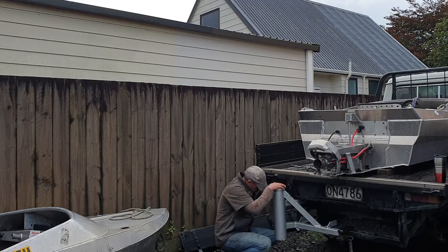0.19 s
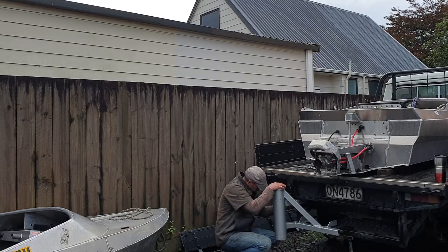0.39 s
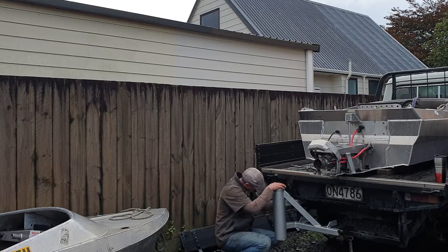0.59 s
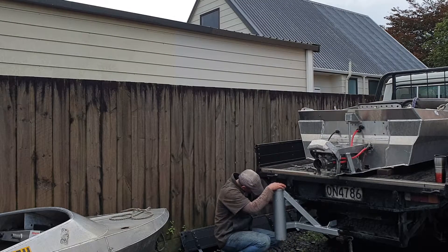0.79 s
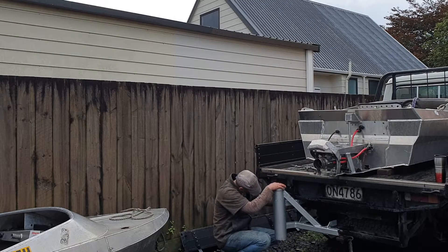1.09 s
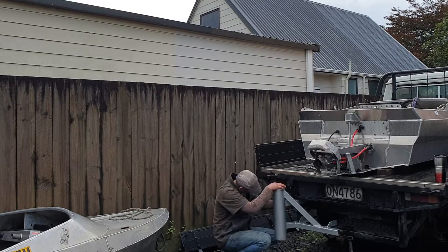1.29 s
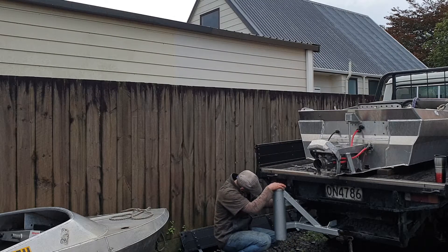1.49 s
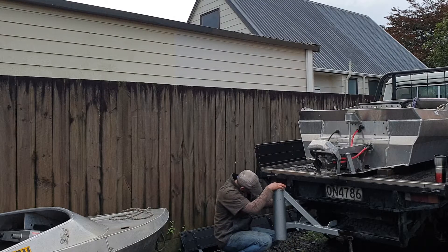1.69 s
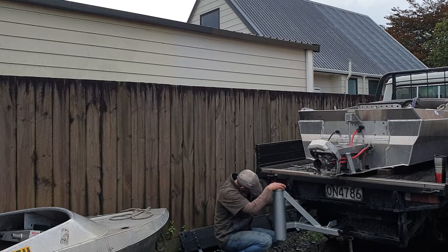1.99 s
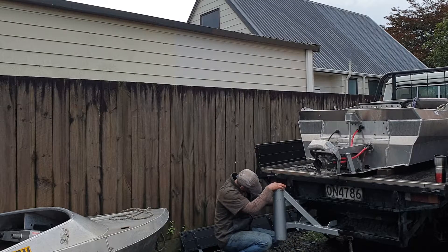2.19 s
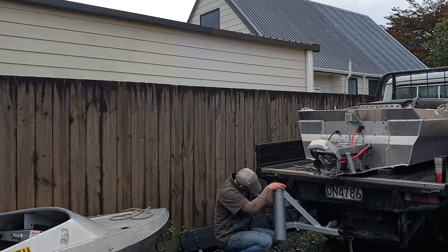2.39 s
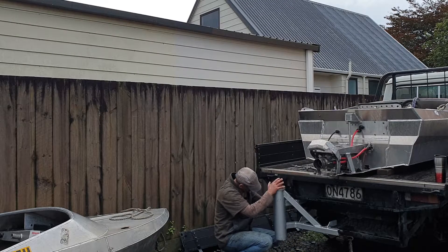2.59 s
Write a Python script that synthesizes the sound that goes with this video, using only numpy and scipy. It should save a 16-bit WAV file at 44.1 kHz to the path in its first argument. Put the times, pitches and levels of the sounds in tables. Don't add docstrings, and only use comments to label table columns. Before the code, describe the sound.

Shrill metal squeaks and hollow thuds as a steel post is rocked by hand outdoors

```python
import sys
import numpy as np
from scipy import signal
from scipy.fft import rfft, irfft
from scipy.io import wavfile

SR = 44100
rng = np.random.default_rng(int(sys.argv[2]) if len(sys.argv) > 2 else 0)


def put_to_file(sound):
    columns = np.atleast_2d(sound).T
    safe = np.clip(columns, -1, 1)
    whole_steps = np.round(safe * 32767)
    wavfile.write(sys.argv[1], SR, whole_steps.astype(np.int16))


def nominal_scale(level):
    x = np.asarray(level, float) / 20
    return 10 ** x


N = 119070

# pitch_hz, density_db (per Hz)
TOWN_SPECTRUM = [(25, -20.5), (50, -2.5), (95, -0.5), (170, -10), (700, -15.5), (1150, -29.5),
                 (4500, -47.5), (9000, -47.5)]
TOWN_DB, TOWN_PAN_DB = -56.5, 3.5
TOWN_ALIKE_HZ = 705

# pitch_hz, width_hz, level_db
WHISPER = [(12000, 2600, -87.5), (7900, 1000, -84)]
# time_s, level_db
WIND_GUSTS = [(0., -58.5), (.22, -53), (.35, -76), (1.2, -71), (1.4, -48), (1.6, -70.5), (2.7, -79)]
RUSTLE_S, RUSTLE_LENGTH_S, RUSTLE_DB = 0.58, 0.14, -66.5

# start_s, length_s, from_hz, to_hz, level_db
BIRD_CALLS = [
    (.09, .1, 5400, 3300, -80),
    (1.945, .045, 5200, 4720, -80),
    (1.975, .25, 4730, 4830, -78),
    (.59, .045, 2850, 2850, -75),
]
# start_s, level_db
GRIT_TICKS = [(1.128, -59), (1.232, -64.5), (1.362, -63.5), (1.372, -66), (2.125, -70.5), (2.345, -53)]

# time_s, grinding_db
HAND_PUSH = [(.15, -57.5), (0.248, -44), (.3, -47), (.37, -39), (0.499, -48), (.6, -61), (1.077, -70),
             (1.178, -33), (1.269, -42), (1.338, -54), (1.449, -77.5), (1.698, -63.5), (1.778, -42.5),
             (1.831, -44.5), (1.882, -38), (1.959, -58.5), (2.2, -76), (2.33, -59), (2.362, -33.5),
             (2.481, -41.5), (2.53, -52), (2.7, -62)]
SLIPS_PER_S, SLIP_SPREAD_DB = 470, 2
# start_s, peak_db
SLEEVE_KNOCKS = [(.349, -44.5), (0.374, -42), (1.113, -34), (1.173, -27), (1.207, -35.5), (1.262, -29.5),
                 (1.355, -39), (1.868, -45.5), (1.892, -39), (2.388, -32.5), (2.416, -39.5), (2.465, -36.5)]
# pitch_hz, width_hz, level_db
FRAME_MODES = [(82.95, 42, -5.5), (127.5, 35, 3.5), (195.7, 45, 3), (295, 78, 1.5), (500, 160, -13.5),
               (807, 53, -12), (1300, 400, -23.5), (1930, 93, -23.5), (2850, 300, -31.5),
               (3500, 150, -33.5), (4800, 750, -25)]
# start_s, length_s, pitch_hz, level_db
SINGING_PARTS = [(.31, .06, 1960, -62), (.35, .11, 1830, -62), (.38, .05, 2000, -64), (.22, .05, 1700, -62),
                 (1.11, .07, 3470, -65), (1.14, .08, 1950, -60), (1.13, .05, 4500, -62),
                 (1.2, .09, 2720, -64), (1.22, .07, 2000, -64), (1.705, .09, 4600, -68),
                 (1.735, .06, 1940, -64), (1.745, .05, 3110, -66), (1.76, .06, 4000, -68),
                 (1.845, .06, 1900, -60), (1.855, .05, 3970, -61), (2.09, .05, 2320, -75),
                 (2.05, .05, 1700, -76), (2.342, .06, 2040, -54), (2.355, .045, 3490, -57),
                 (2.345, .035, 4800, -55), (2.425, .05, 3750, -58), (2.42, .07, 1930, -62)]
RING_WIDTH_HZ, RING_DB = 230, -3
# pitch_hz, density_db (per Hz)
SCRAPE_SPECTRUM = [(1000, -1.5), (2500, -5.5), (5000, -2), (6900, -5.5), (7900, -36), (10000, -32),
                   (12000, -21.5), (13800, -41)]
SCRAPE_DB, FRAME_PAN_DB = -17, 3

# time_s, slip_hz, level_db, overtones_db
LOW_SQUEALS = [
    [(.178, 2666, -74, -25.5), (.19, 2620, -60.5, -36), (.215, 2710, -64, -17.5),
     (.222, 2784, -55.5, -10.5), (.23, 3052, -37, -14), (.244, 3047, -30, -2.5), (.252, 3000, -55, -10)],
    [(.242, 3620, -49, -16), (.25, 3666, -28.5, -4), (.266, 3582, -28.5, -3), (.278, 3468, -19.5, -20),
     (.29, 3457, -23.5, -10.5), (.306, 3440, -19, -28), (.32, 3446, -24.5, -22), (.328, 3430, -43, -21.5)],
    [(.24, 3790, -32.5, -46), (.247, 3764, -22, -40.5), (.261, 3782, -20, -36), (.272, 3775, -22.5, -47.5),
     (.285, 3800, -29.5, -43), (.305, 3800, -41, -39), (.312, 3800, -54.5, -40.5)],
]
# time_s, slip_hz, level_db, overtones_db
EARLY_SQUEALS = [
    [(.406, 5770, -60, -14), (.412, 5760, -33.5, -15), (.428, 5680, -26, -16.5), (.44, 5750, -32.5, -21.5),
     (.447, 5830, -18, -27.5), (.456, 5830, -39.5, -5), (.47, 5450, -55.5, -15.5)],
    [(1.098, 5840, -61.5, -32), (1.118, 5820, -60.5, -26), (1.128, 5865, -24, -7.5), (1.142, 5860, -28, -3),
     (1.151, 5860, -19.5, -9), (1.163, 5910, -33, -4.5), (1.2, 5776, -31.5, -19), (1.21, 5827, -49, -18),
     (1.26, 5675, -51, -26)],
    [(1.15, 6200, -64, 3), (1.17, 6200, -38, -1), (1.195, 6330, -46.5, -2.5), (1.215, 6250, -60, -5)],
    [(1.21, 3404, -73, -26.5), (1.23, 3524, -51, -35), (1.29, 3500, -65, -32), (1.31, 3500, -63.5, -29)],
]
# time_s, slip_hz, level_db, overtones_db
LATE_SQUEALS = [
    [(1.772, 5862, -66, -23), (1.782, 5924, -33, -16.5), (1.799, 5730, -21, -12), (1.805, 6050, -23, -12),
     (1.812, 6073, -15.5, -9), (1.826, 6057, -16.5, -16), (1.834, 6030, -28, -5), (1.87, 6057, -36, -3),
     (1.9, 6074, -48, -8)],
    [(2.332, 5947, -49.5, -15.5), (2.346, 5938, -42, 6), (2.354, 5973, -27.5, 1.5),
     (2.365, 5862, -36.5, 8.5), (2.378, 5971, -29, -7.5), (2.405, 5780, -38, -2.5), (2.432, 5696, -27, -18),
     (2.448, 5486, -41.5, -24), (2.49, 5460, -55, -18)],
]
# pan_db, overtone_pan_db (left over right), lead_rad, roughness (0-1)
SQUEAL_PORTS = [(-7, 5.5, -0.8, 0.7), (-2, 11, 0, 0.2), (-9.5, -2.5, 0.8, .1), (6, 13.5, 1.87, 0),
                (6, 9, 5, 0.42), (6.5, 4.5, 0.5, 1), (-3, -7.5, 2.5, 0), (6.5, 5, -2, 0.25),
                (6.5, 6.5, 1.6, .45)]
OVERTONE_FALL_DB, OVERTONE_LEAD_RAD = -8, 1.9
CHATTER_DB, CHATTER_HZ, WOBBLE = -25, 1110, 0.004

# delay_s, level_db
YARD_SLAPS = [
    (0.01, -7.5),
    (0.021, -15.5),
    (.041, -25),
]
# pitch_hz, gain_db
YARD_TONE = [(100, -10), (600, 3), (3600, -4.5), (6000, -1.16), (12000, 3)]
NEAR_T60_S, NEAR_DB = 0.2, -14.5
YARD_T60_S, YARD_DB, YARD_PAN_DB = 0.45, -13.5, -1
TREBLE_T60_SHARE = 0.55
WAVER, WAVER_HZ = 0.5, 220

# pitch_hz, gain_db
MIC_RESPONSE = [(20, -9), (50, -0.44), (7400, 1.06), (8700, -7), (10300, 2.05), (13000, -1), (15500, -5.5)]


def unit(x):
    return x / np.sqrt(np.mean(x ** 2))


def band(x, hz, width_hz):
    return signal.lfilter(*signal.iirpeak(min(hz, 0.45 * SR), hz / width_hz, fs=SR), x)


def band_twice(x, hz, width_hz):
    return band(band(x, hz, width_hz), hz, width_hz)


def colour(x, spectrum):
    hz, db = np.array(spectrum, float).T
    f = np.fft.rfftfreq(x.shape[-1], 1 / SR)
    gain = nominal_scale(np.interp(np.log(f + 1), np.log(hz), db))
    return irfft(rfft(x) * gain, x.shape[-1])


def walk(rate_hz, size=N):
    lowpass = signal.butter(3, min(rate_hz / 2, 0.4 * SR), fs=SR, output="sos")
    settling = int(min(SR / 2, 9 * SR / rate_hz))
    return unit(signal.sosfilt(lowpass, rng.standard_normal(size + settling))[-size:])


def pan(db):
    return nominal_scale(np.array([[db / 2], [-db / 2]]))


def town():
    out, swell = 0, walk(0.32)
    for hz in 30 * 2 ** np.arange(0, 9.5, 0.5):
        mid = band(rng.standard_normal(N), hz, hz / 2)
        side = band(rng.standard_normal(N), hz, hz / 2)
        wide = np.clip(hz / TOWN_ALIKE_HZ, 0.15, 1)
        stereo = (mid + wide * side * np.array([[1], [-1]])) / np.sqrt(1 + wide ** 2)
        out = out + nominal_scale(0.24 * swell + 1.2 * walk(18)) * stereo
    return unit(colour(out, TOWN_SPECTRUM)) * nominal_scale(TOWN_DB) * pan(TOWN_PAN_DB)


def air(t):
    noise = rng.standard_normal((2, N))
    whisper = sum(nominal_scale(db) * unit(band_twice(noise, hz, width)) for hz, width, db in WHISPER)
    brush = np.exp(-((t - RUSTLE_S) / RUSTLE_LENGTH_S) ** 2)
    rustle = nominal_scale(RUSTLE_DB) * brush * unit(band(noise, 3300, 5500))
    s, db = np.array(WIND_GUSTS).T
    rumble = rng.standard_normal(N) + 0.5 * noise
    wind = unit(band(band(rumble, 65, 60), 53, 90)) * nominal_scale(np.interp(t, s, db) + 3.8 * walk(15))
    return whisper + rustle + wind


def birds(t):
    out = 0
    for s, length, from_hz, to_hz, db in BIRD_CALLS:
        u = np.clip((t - s) / length, 0, 1)
        hz = (from_hz + (to_hz - from_hz) * u) * (1 + 0.012 * walk(140))
        breath = nominal_scale(db + 2 * walk(60)) * np.clip(3 * np.sin(np.pi * u), 0, 1)
        out = out + breath * np.sin(2 * np.pi * np.cumsum(hz) / SR)
    return out * pan(3.4)


def ticks(t):
    env = sum(nominal_scale(db) * (t > s) * np.exp(-np.clip(t - s, 0, 1) / 0.012) for s, db in GRIT_TICKS)
    return env * unit(np.diff(rng.standard_normal((2, N + 2)), 2))


def knocking_body(push):
    struck = rng.random(N) < SLIPS_PER_S / SR
    sizes = nominal_scale(SLIP_SPREAD_DB * rng.exponential(size=N)) * np.sign(rng.standard_normal(N))
    slips = unit(struck * sizes) * push
    for s, db in SLEEVE_KNOCKS:
        slips[int(s * SR)] -= nominal_scale(db + 15)
    body = 0
    for hz, width, db in FRAME_MODES:
        body = body + nominal_scale(db) * np.sqrt(SR / width / 4) * band_twice(slips, hz, 1.49 * width)
    return body / 2


def singing_parts(t, grit):
    out = 0
    for s, length, hz, db in SINGING_PARTS:
        u = np.clip((t - s) / length, 0, 1)
        env = np.sqrt(np.sin(np.pi * u ** 0.7).clip(0))
        out = out + nominal_scale(db + RING_DB) * env * unit(band_twice(grit, hz, RING_WIDTH_HZ))
    return out


def scrape(push, grit):
    return unit(colour(grit, SCRAPE_SPECTRUM)) * push * nominal_scale(SCRAPE_DB + 1.8 * walk(60))


def frame(t):
    s, db = np.array(HAND_PUSH, float).T
    push = nominal_scale(np.interp(t, s, db))
    grit = rng.standard_normal((2, N))
    return (knocking_body(push) + scrape(push, grit) + singing_parts(t, grit)) * pan(FRAME_PAN_DB)


def squeal(u, rows, ports):
    s, hz, db, over_db = np.array(rows, float).T
    pan_db, over_pan_db, lead_rad, rough = ports

    def drift(rate_hz):
        return np.array([walk(rate_hz, size=int(0.3 * SR))[:len(u)] for _ in range(2)])

    slip_hz = np.interp(u, s, hz) * (1 + WOBBLE * rough * drift(390)[0])
    phase = 2 * np.pi * np.cumsum(slip_hz) / SR
    env = nominal_scale(np.interp(u, s, db)) * np.sqrt(2) * signal.windows.tukey(len(u), 400 / len(u))
    out = np.zeros((2, len(u)))
    for k in range(1, 5):
        if k * hz.max() >= 0.36 * SR:
            continue
        size, lead = pan(pan_db), lead_rad
        if k > 1:
            size = pan(over_pan_db) * nominal_scale(np.interp(u, s, over_db) + OVERTONE_FALL_DB * (k - 2))
            lead = OVERTONE_LEAD_RAD
        skirt_hz = CHATTER_HZ * k ** 0.5
        chatter = nominal_scale(CHATTER_DB) * rough * 4 * (drift(skirt_hz) + 1j * drift(skirt_hz))
        flutter = 1 + 1.1 * rough * drift(260) + k ** 0.54 * chatter
        tone = np.exp(1j * (k * phase + lead * np.array([[1], [0]])))
        out += env * size * np.real(flutter * tone)
    return out


def squeals(t):
    out = np.zeros((2, N))
    for rows, ports in zip(LOW_SQUEALS + EARLY_SQUEALS + LATE_SQUEALS, SQUEAL_PORTS):
        on = slice(int(rows[0][0] * SR), int(rows[-1][0] * SR))
        out[:, on] += squeal(t[on], rows, ports)
    return out


def yard(x):
    u = np.arange(int(0.8 * SR)) / SR

    def fade(t60_s, db):
        return unit(nominal_scale(-60 * u / t60_s)) * nominal_scale(db) / np.sqrt(len(u))

    def diffuse(kind):
        split = signal.butter(4, 8500, kind, fs=SR, output="sos")
        return signal.sosfilt(split, rng.standard_normal((2, len(u))))

    near = fade(NEAR_T60_S, NEAR_DB)
    tail = diffuse("low") * (fade(YARD_T60_S, YARD_DB) + near)
    tail += diffuse("high") * (fade(YARD_T60_S * TREBLE_T60_SHARE, YARD_DB) + near)
    tail = tail * np.clip(u / 0.0066, 0, 1) * pan(YARD_PAN_DB)
    for s, db in YARD_SLAPS:
        tail[0, int(s * SR)] += nominal_scale(db)
        tail[1, int(s * 1.07 * SR)] += nominal_scale(db)
    waver = (1 + WAVER * np.array([walk(WAVER_HZ), walk(WAVER_HZ)])) / np.hypot(1, WAVER)
    return x + signal.fftconvolve(colour(x, YARD_TONE) * waver, tail, axes=1)[:, :N]


def scene():
    t = np.arange(N) / SR
    return town() + air(t) + yard(birds(t) + ticks(t) + frame(t) + squeals(t))


def top_cut(x):
    return signal.sosfilt(signal.butter(12, 15680, fs=SR, output="sos"), x)


def record(dry):
    mix = colour(dry, MIC_RESPONSE)
    return top_cut(mix)


dry = scene()
out = record(dry)
put_to_file(out)
```